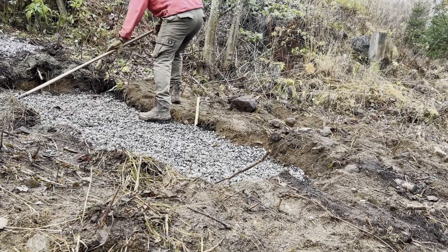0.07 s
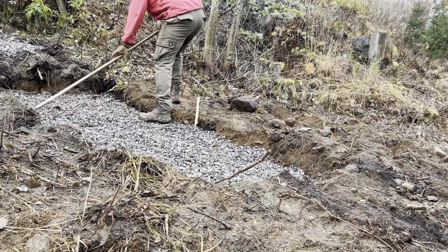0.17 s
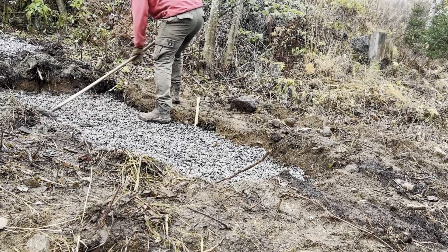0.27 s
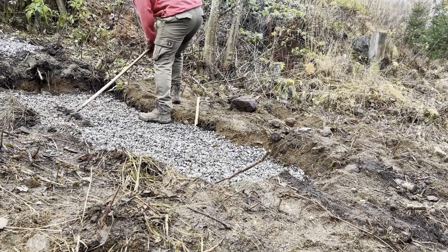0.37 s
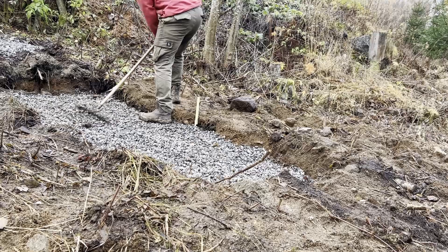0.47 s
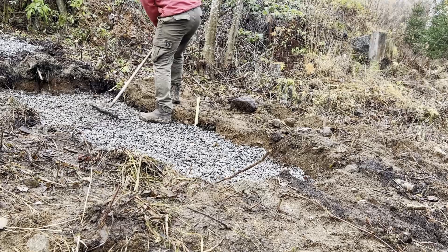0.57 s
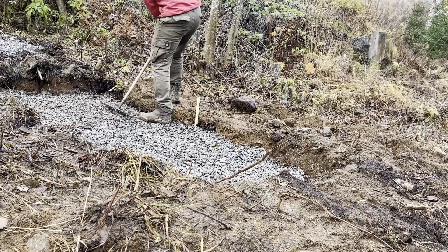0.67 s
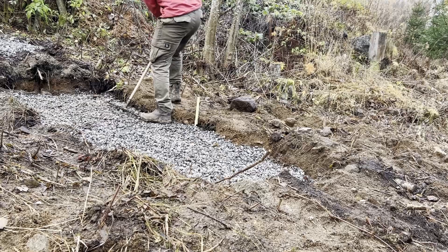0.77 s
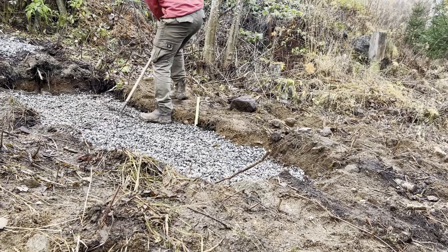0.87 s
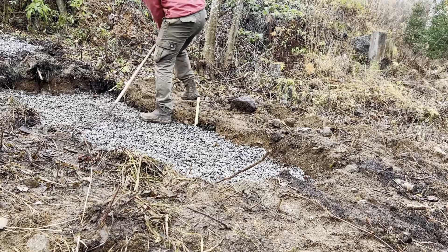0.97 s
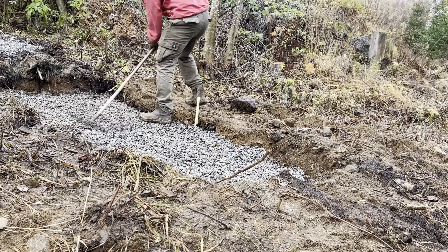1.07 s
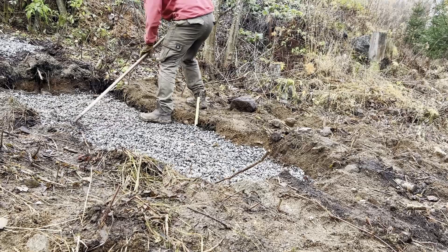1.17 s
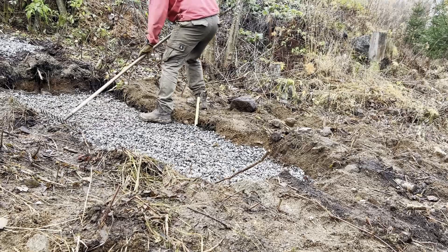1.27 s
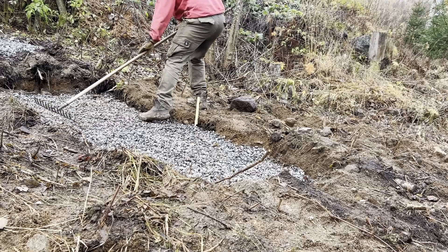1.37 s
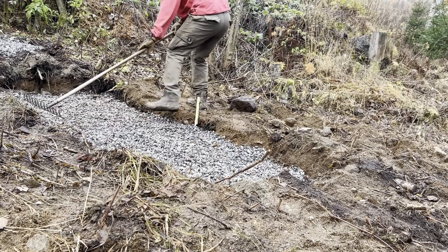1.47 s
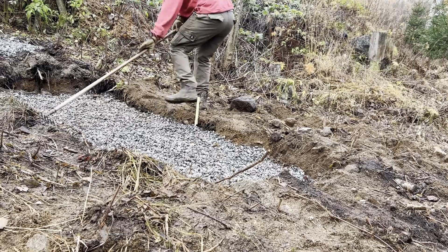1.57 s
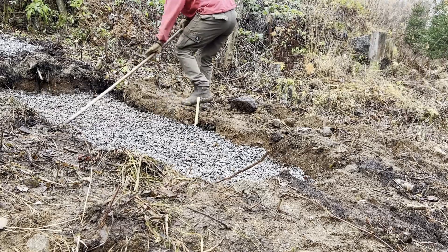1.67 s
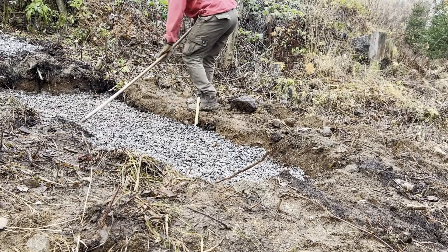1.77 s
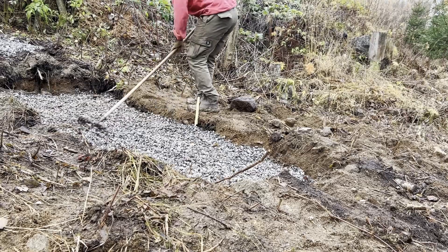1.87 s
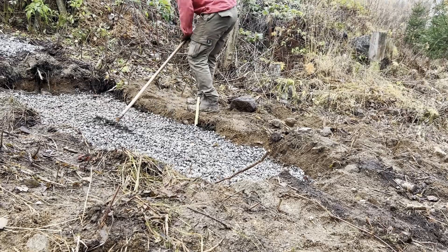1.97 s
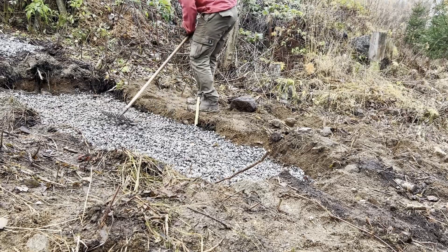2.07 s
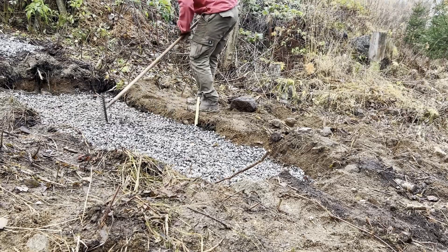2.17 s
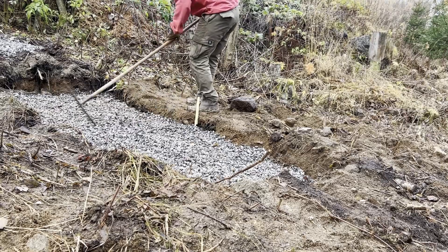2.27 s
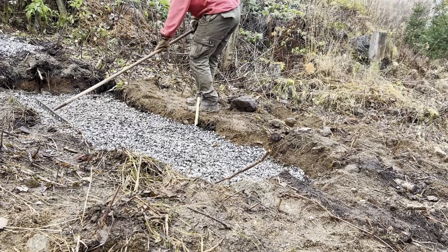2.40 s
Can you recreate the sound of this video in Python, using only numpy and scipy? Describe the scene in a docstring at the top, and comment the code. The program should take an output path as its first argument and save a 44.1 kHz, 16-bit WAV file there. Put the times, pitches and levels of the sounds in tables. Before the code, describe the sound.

A steel rake drags through crushed gravel in uneven strokes, stones scraping, crunching and clinking

```python
"""Rake dragged through gravel

A steel rake is dragged through crushed gravel in an outdoor trench, three pulls and pushes.
Stones crack as filtered random impulses; the tines ring as resonators that such impulses kick.
The ground rumbles as filtered noise and thuds as a sine of falling pitch.
Big stones knock as short damped tones; loose ones tick as a blow with a chatter of noise.
Two close microphone ports hear the rake from one side, over a faint distant hum of noise."""
import sys
import numpy as np
from scipy import signal
from scipy.fft import rfft, irfft, next_fast_len
from scipy.io import wavfile
from scipy.ndimage import map_coordinates

SR = 44100
rng = np.random.default_rng(int(sys.argv[2]) if len(sys.argv) > 2 else 0)


def generate_wav(sig):
    """Save sig (samples, or channels by samples) to the path in sys.argv[1] as 16-bit PCM at SR."""
    pcm = np.round(np.clip(np.atleast_2d(sig).T, -1, 1) * 32767).astype(np.int16)
    wavfile.write(sys.argv[1], SR, pcm)


def rack_gain(trim_db):
    """Turn a fader trim in dB into the linear factor to multiply a signal by."""
    fader = np.asarray(trim_db, float)
    return 10 ** (fader / 20)


N = 108045  # samples

# colour of stone on stone: (frequency [Hz], relative spectrum level [dB])
STONE_SPECTRUM = [(300, -18), (1500, -16), (5000, -7.5), (7000, -0.5), (9500, 1), (15700, -4)]


def unit(x):
    """Normalization: the signal is scaled to rms 1."""
    return x / np.sqrt(np.mean(x ** 2) + 1e-20)


def along(points, hz):
    """Interpolation of (frequency [Hz], value) points on a log axis, flat beyond the ends."""
    f, v = np.transpose(points)
    return np.interp(np.log(hz + 1), np.log(f + 1), v)


def curves(rows):
    """Linear interpolation in time: one value per sample for each column after the time."""
    time, *columns = np.transpose(rows)
    return [np.interp(np.arange(N) / SR, time, column) for column in columns]


def filtered(x, response):
    """Linear filtering: the spectrum is multiplied by a complex response of frequency."""
    m = next_fast_len(N + 8192)
    return irfft(rfft(x, m) * response(np.fft.rfftfreq(m, 1 / SR)), m)[..., :N]


def coloured(x, spectrum):
    """Zero-phase filtering by a (frequency [Hz], level [dB]) spectrum."""
    return filtered(x, lambda hz: rack_gain(along(spectrum, hz)))


def wobble(rate):
    """Slow random modulation: a smooth curve through rate random knots a second."""
    knots = rng.standard_normal(int(N * rate / SR) + 4)
    return map_coordinates(knots, [np.arange(N) * rate / SR])


def cracks(per_s):
    """Shot noise: random contacts of uneven size over fine grit, power near 1 at any density."""
    size_spread_db, grit_db = 4.8, -6
    chance = np.clip(per_s / SR, 1e-3, 1)  # of a contact in each sample
    size = rack_gain(size_spread_db * np.clip(rng.standard_normal(N), -2, 2))
    size = size * np.sign(rng.standard_normal(N))
    hits = unit(size) * (rng.random(N) < chance) / np.sqrt(chance)
    return hits + rack_gain(grit_db) * rng.standard_normal(N)


def tines(kicks):
    """Modal resonance: each mode of the steel rake head rings from its own kicks, wavering in level."""
    # modes of the rake head: (frequency [Hz], bandwidth [Hz], relative drive [dB])
    modes = [(1093, 260, -7.5), (1662, 113, -6), (1952, 204, -3.5), (2507, 57, 2), (2843, 51, -0.5),
             (3312, 170, -4.5), (4380, 830, -15)]
    ring = np.zeros(N)
    for centre, width, db in modes:
        def resonance(f):
            return 1j * f * width / (centre * centre - f * f + 1j * f * width)
        drive = rack_gain(db + 4 * wobble(14.13)) * kicks()
        ring += filtered(drive, resonance)
    return ring


def drag():
    """Granular friction: stones rattle, shake the tines, crunch and rumble under the stroke."""
    # the stones under the stroke: (time [s], rattle level [dB])
    stroke = [(0, -55), (.062, -64), (.072, -46.5), (.13, -69.5), (.175, -74), (.192, -50), (.24, -41),
              (.29, -34.5), (.45, -31.5), (.68, -38.5), (.75, -47.5), (.81, -48), (.893, -45), (.903, -37),
              (1.0, -29.5), (1.046, -33.5), (1.05, -25.5), (1.062, -46), (1.08, -41), (1.09, -26.5),
              (1.13, -30), (1.2, -37.5), (1.28, -49), (1.4, -54.5), (1.47, -66), (1.66, -91),
              (1.668, -37.5), (1.71, -42.5), (1.77, -33), (1.945, -32), (2.0, -35), (2.15, -40.5),
              (2.24, -52), (2.45, -77.5)]
    # the rake's contact: (time [s], tine scrape before gain [dB], low crunch [dB], ground rumble [dB])
    contact = [(.06, -90, -67, -70), (.075, -60, -54, -60), (.18, -70, -52.5, -62),
               (.21, -43.5, -61.5, -49), (.46, -44, -55, -48), (.6, -53.5, -60, -58),
               (.82, -57, -60.5, -61), (.95, -48.5, -58, -61), (1.05, -45.5, -68, -64),
               (1.11, -38.5, -55.5, -47.5), (1.25, -47.5, -60, -68), (1.45, -74, -65.5, -63),
               (1.66, -78, -80, -72.5), (1.67, -42.5, -49.5, -44), (1.8, -41, -61.5, -58),
               (1.95, -45.5, -55, -43.5), (2.06, -60, -74.5, -64), (2.45, -110, -67, -67)]
    # (frequency [Hz], relative spectrum level [dB])
    crunch_spectrum = [(100, -9.5), (200, 0), (500, -1), (900, -10.5), (1500, -20)]
    # (frequency [Hz], relative spectrum level [dB])
    ground_spectrum = [(25, -41), (55, -6), (90, -9.5), (150, -20), (300, -29)]
    tine_gain_db = 9
    full_per_s, full_db, thinning = 4000, -39.5, .7  # cracks at full flow; weaker flow = fewer cracks

    (rattle_db,) = curves(stroke)
    tine_db, crunch_db, ground_db = curves(contact)
    per_s = full_per_s * rack_gain(thinning * (rattle_db - full_db))
    rattle_level = rack_gain(rattle_db + 0.82 * wobble(45.55) + 0.99 * wobble(220))
    rattle = rattle_level * unit(coloured(cracks(per_s), STONE_SPECTRUM))
    scrape = tines(lambda: rack_gain(tine_db + tine_gain_db) * cracks(per_s / 5))
    crunch = unit(coloured(cracks(per_s=1200), crunch_spectrum))
    crunch = rack_gain(crunch_db + 1.5 * wobble(30.35)) * crunch
    ground = unit(coloured(rng.standard_normal(N), ground_spectrum))
    ground = rack_gain(ground_db + 2.1 * wobble(24)) * ground
    return rattle + scrape + crunch + ground


def hum():
    """Partial coherence: faint distant noise, of which both ports share a part."""
    # (frequency [Hz], relative spectrum level [dB])
    hum_spectrum = [(18, -49), (30, -5), (194, -2), (684, 1), (913, -8.5), (1390, -10), (16000, -48)]
    shared, own = rng.standard_normal(N), rng.standard_normal((2, N))
    return rack_gain(-66.5) * unit(coloured(shared + 1.8 * own, hum_spectrum))


def knocks():
    """Damped oscillation: a bigger stone, struck, gives one short tone."""
    # knocks and clacks: (time [s], envelope peak [dB], frequency [Hz])
    big_stones = [(.1815, -46, 500), (.201, -28, 3000), (.76, -43, 750), (.762, -47, 260), (.775, -44, 330),
                  (.779, -47, 900), (.785, -46, 270), (1.279, -43, 640), (1.3065, -49, 620),
                  (1.32, -44, 600), (1.674, -29, 1900)]
    rise_s = .001  # from onset to envelope peak
    out, t = np.zeros(N + SR), np.arange(SR // 20) / SR
    envelope = t / rise_s * np.exp(1 - t / rise_s)
    for s, db, hz in big_stones:
        out[round(s * SR):][:len(t)] += rack_gain(db) * envelope * np.sin(2 * np.pi * hz * t)
    return out[:N]


def landings():
    """Impact excitation: each dig is a burst of cracks, a ring of tines and handle, a sagging thud."""
    # the rake head digs in or knocks:
    # (time [s], crack drive [dB], ring drive before gain [dB], thud drive [dB], settled thud pitch [Hz])
    digs = [(0.192, -25.5, -39.5, -39, 52.2), (0.367, -17.5, -42.5, -61, 60), (0.757, -27, -56, -65, 56.3),
            (1.097, -17.5, -39.5, -39.5, 81), (1.664, -21.5, -41.5, -38.5, 47.7),
            (1.938, -19, -48, -54, 61)]
    # handle modes: (frequency [Hz], level over the thud [dB], t60 [s])
    handle = [(232, 7, 0.062)]
    ring_gain_db = 21.5
    crack_t60_s, crack_rise_s = 0.091, 0.0032
    thud_lag_s = thud_rise_s = .008
    thud_t60_s = .3

    crack, kick, low = np.zeros((3, N + SR))
    t = np.arange(SR // 3) / SR
    burst = rack_gain(-60 * t / crack_t60_s) * (1 - np.exp(-t / crack_rise_s))
    thud_rise = 1 - np.exp(-t / thud_rise_s)
    sag_s = 0.74 * 0.018 * (1 - np.exp(-t / 0.012))  # phase advance: the pitch starts high and falls
    for s, crack_db, ring_db, thud_db, thud_hz in digs:
        at = slice(round(s * SR), round(s * SR) + len(t))
        crack[at] += rack_gain(crack_db) * burst
        kick[at] += rack_gain(ring_db + ring_gain_db) * burst
        thud = rack_gain(thud_db - 60 * t / thud_t60_s) * np.sin(2 * np.pi * thud_hz * (t + sag_s))
        wood = sum(rack_gain(thud_db + db - 60 * t / t60) * np.sin(2 * np.pi * hz * t)
                   for hz, db, t60 in handle)
        low[round((s + thud_lag_s) * SR):][:len(t)] += thud_rise * (thud + wood)
    stones = coloured(crack[:N] * cracks(6000), STONE_SPECTRUM)
    ring = tines(lambda: kick[:N] * rng.standard_normal(N))
    return stones + ring + low[:N]


def ticks():
    """Impulse response: loose stones click one by one, each a blow and a short chatter."""
    # single stones: (time [s], blow before colouring [dB])
    loose_stones = [(.5026, -10), (.6049, -13), (.6209, -14), (.7, -17), (.9029, -17), (1.048, -3),
                    (1.445, -35), (1.8702, -8), (2.0395, -12), (2.1102, -12), (2.16, -15), (2.1763, -19),
                    (2.2202, -14), (2.2546, -30), (2.2669, -31), (2.2805, -34), (2.291, -25), (2.3003, -24),
                    (2.3602, -36)]
    chatter_t60_s = .0025
    out, t = np.zeros(N + SR), np.arange(300) / SR
    for s, db in loose_stones:
        chatter = .2 * rack_gain(-60 * t / chatter_t60_s) * rng.standard_normal(len(t))
        blow = t == 0  # a single sample
        out[round(s * SR):][:len(t)] += rack_gain(db) * (chatter + blow)
    return coloured(out[:N], STONE_SPECTRUM)


def scattered(x):
    """Diffuse scattering: short trench echoes, one per port, drawn anew every hop and crossfaded."""
    trench_t60_s, hop = .012, 1024  # hop in samples
    out, t = np.zeros((2, N + SR)), np.arange(SR // 25) / SR
    fade, padded = signal.get_window("hann", 2 * hop), np.pad(x, (hop, 2 * hop))
    for k in range(0, N + hop, hop):
        tail = rng.standard_normal((2, len(t))) * rack_gain(-60 * t / trench_t60_s)
        tail = tail / np.linalg.norm(tail[0])
        piece = padded[k:k + 2 * hop] * fade
        part = signal.fftconvolve(piece[None], tail, axes=1)
        out[:, k:k + part.shape[1]] += part
    return out[:, hop:hop + N]


def ports(x):
    """Partial coherence: direct sound lags between the ports, scatter differs from port to port."""
    # (frequency [Hz], phase by which left leads right [rad])
    lead = [(60, .05), (1100, .7), (1700, .9), (2300, 0), (4600, .1), (5300, 1.8), (6600, 2.4), (9500, 6.3),
            (12600, 9.4), (15700, 12.5)]
    # (frequency [Hz], left minus right level [dB])
    tilt = [(200, -.7), (1200, 2), (1750, 5), (2750, -3), (4500, -2), (5500, -6), (7400, -2), (8000, 0)]
    # likeness of the ports: (frequency [Hz], direct share of the power [0 to 1])
    alike = [(60, .99), (250, .87), (700, .6), (2200, .9), (4800, .45), (6000, .72), (9000, .84)]
    side = np.array([[.5], [-.5]])  # each port takes half the difference

    def share(hz):
        return np.clip(along(alike, hz), .05, .99)

    direct = filtered(x, lambda hz: np.sqrt(share(hz)) * np.exp(1j * side * along(lead, hz)))
    scatter = filtered(scattered(x), lambda hz: np.sqrt(1 - share(hz)))
    return filtered(direct + scatter, lambda hz: rack_gain(side * along(tilt, hz)))


def scene():
    """Superposition: rake and stones at the ports, over the hum."""
    return ports(drag() + landings() + knocks() + ticks()) + hum()


def roll_off(x):
    """The treble ends steeply here."""
    return signal.sosfilt(signal.butter(12, 16810, fs=SR, output="sos"), x)


def record(dry):
    """Band limitation: a steep low-pass filter limits the treble of the mix."""
    # (frequency [Hz], level [dB])
    band_limit = [(15850, 0), (16050, -32), (16900, -75)]
    return roll_off(coloured(dry, band_limit))


dry = scene()
out = record(dry)
generate_wav(out)
```